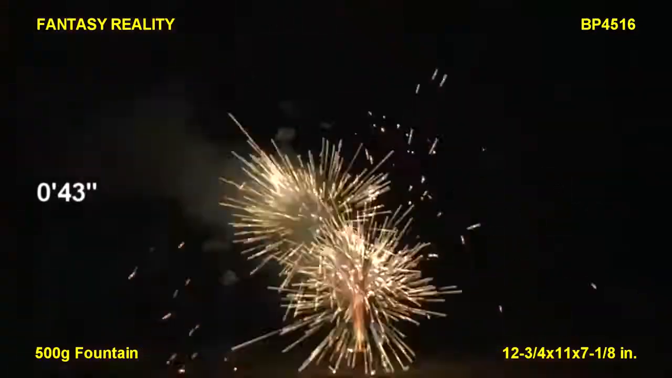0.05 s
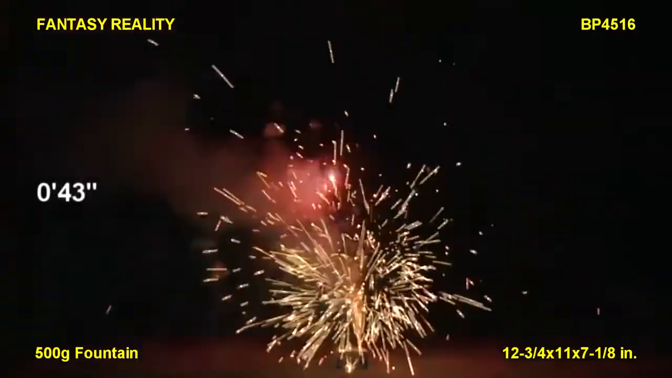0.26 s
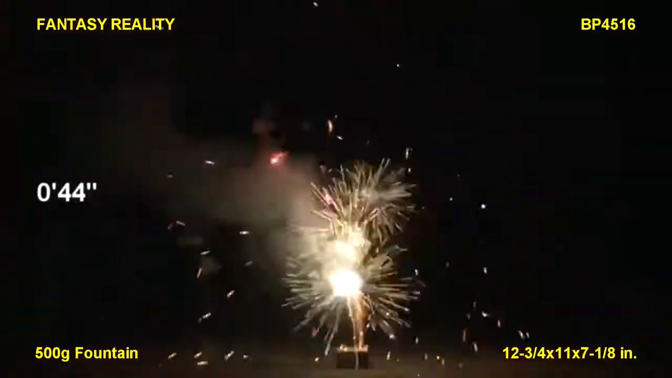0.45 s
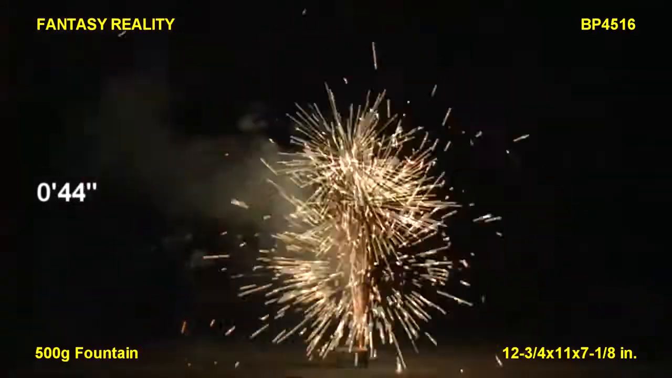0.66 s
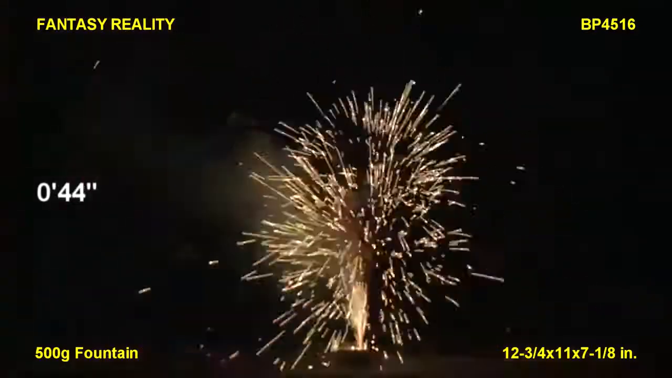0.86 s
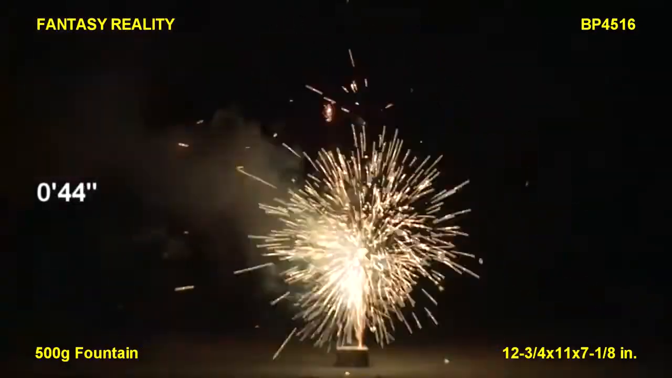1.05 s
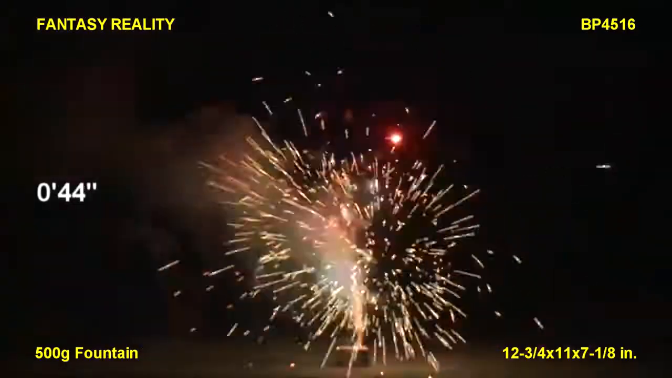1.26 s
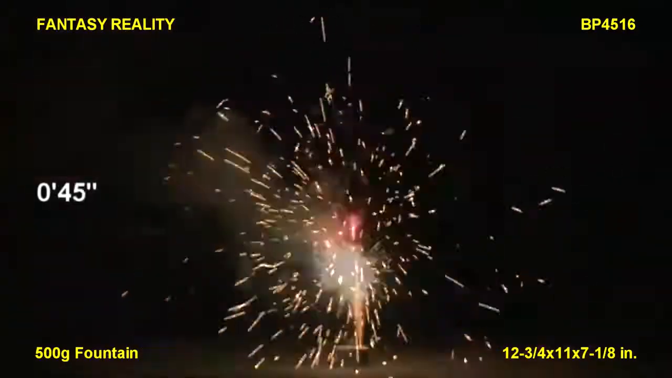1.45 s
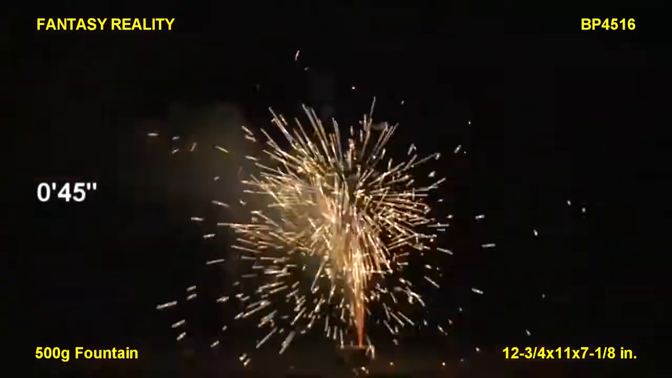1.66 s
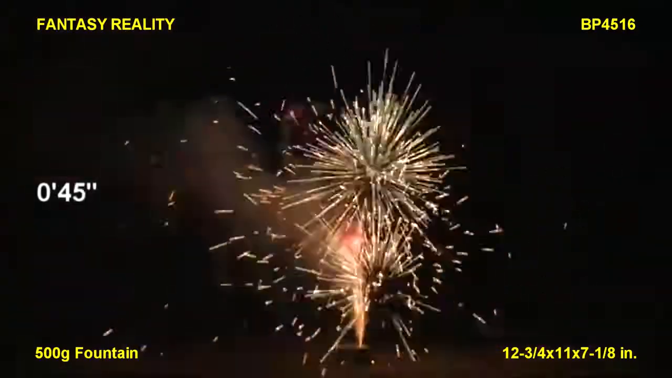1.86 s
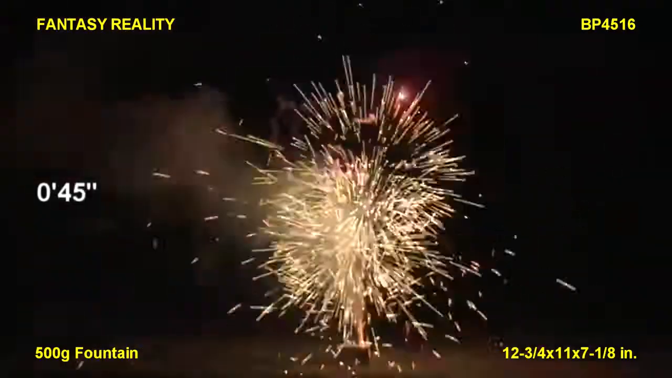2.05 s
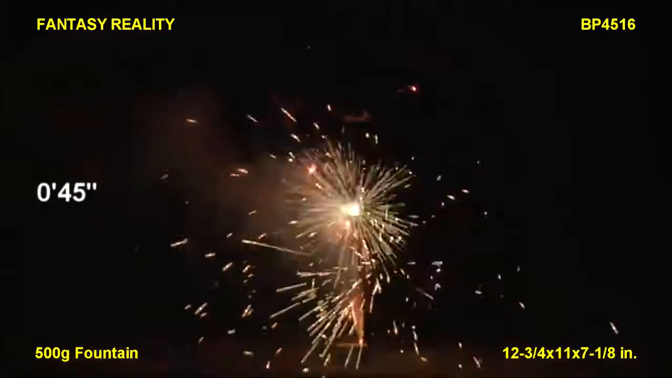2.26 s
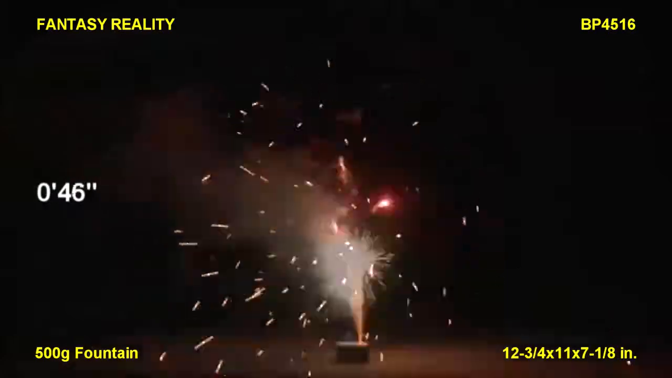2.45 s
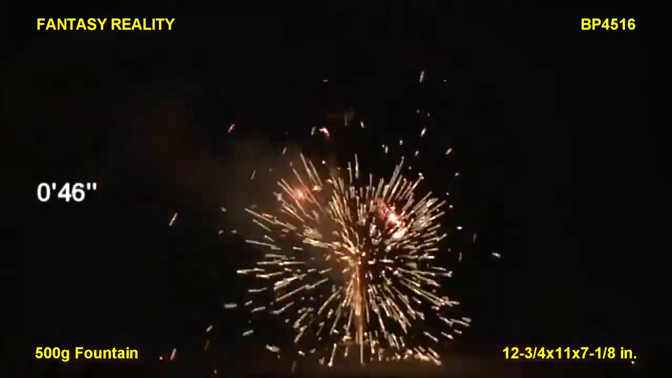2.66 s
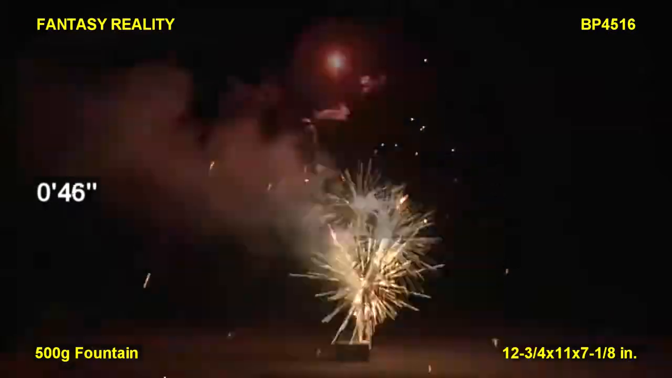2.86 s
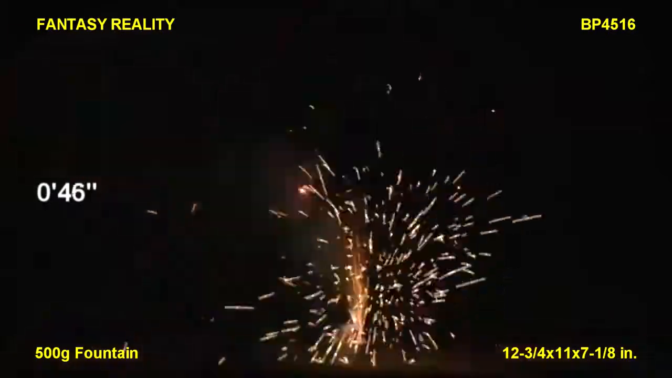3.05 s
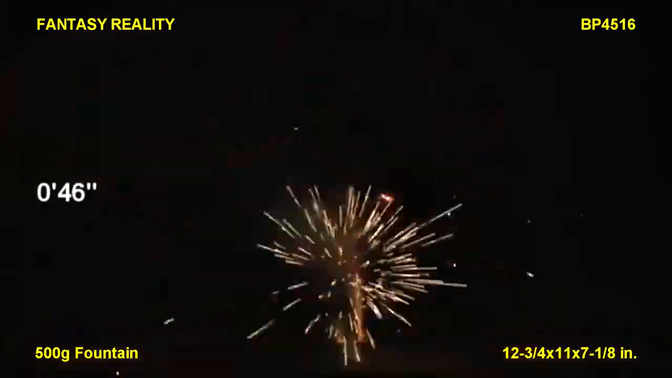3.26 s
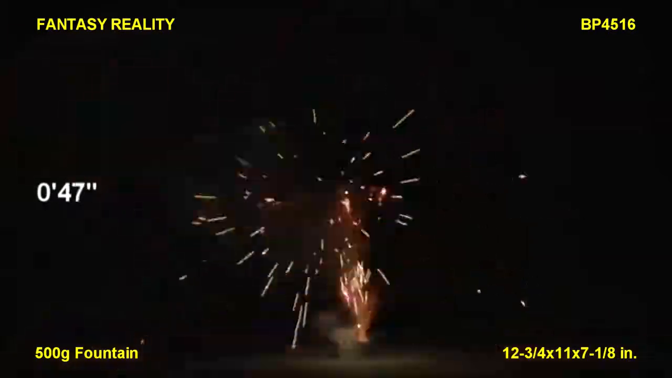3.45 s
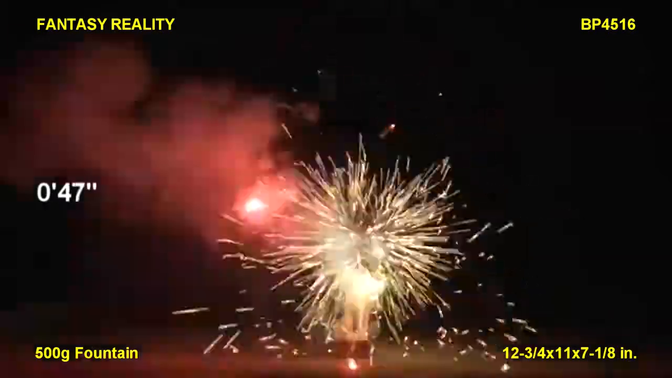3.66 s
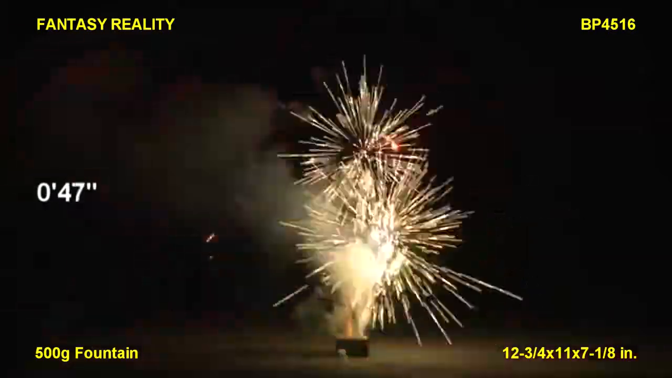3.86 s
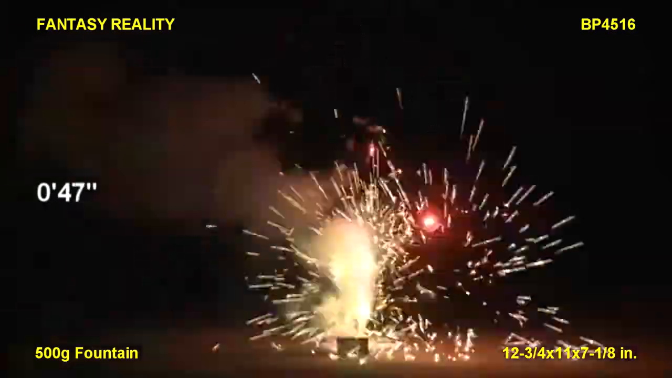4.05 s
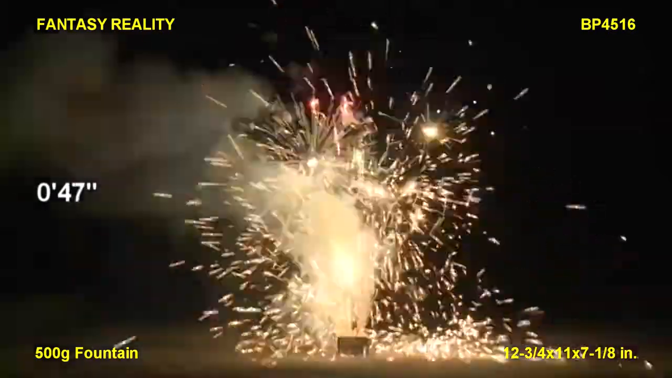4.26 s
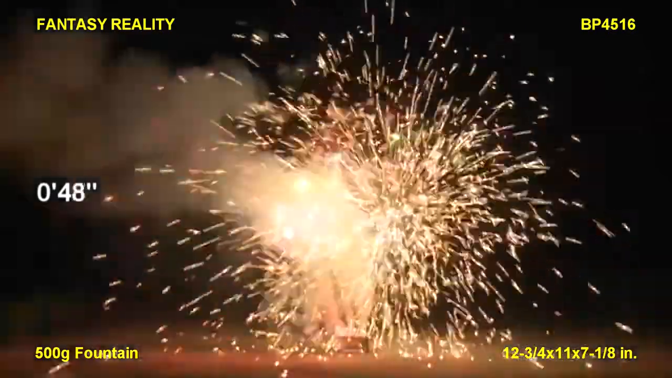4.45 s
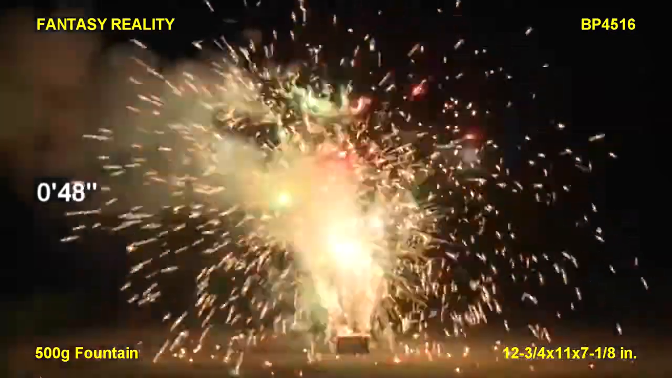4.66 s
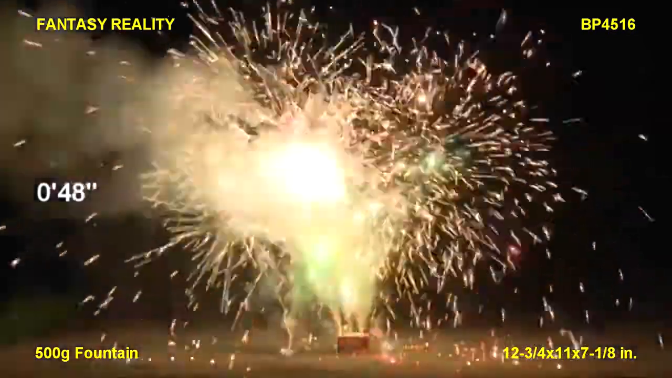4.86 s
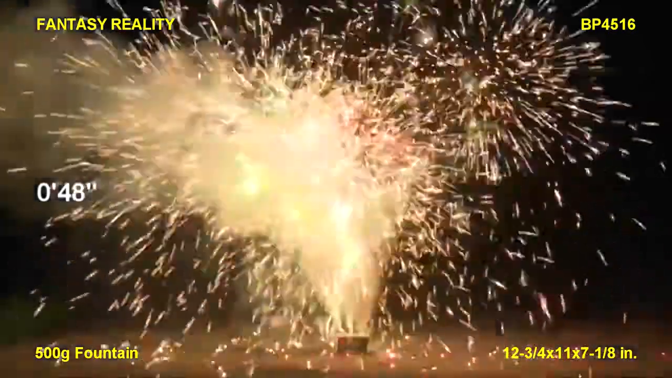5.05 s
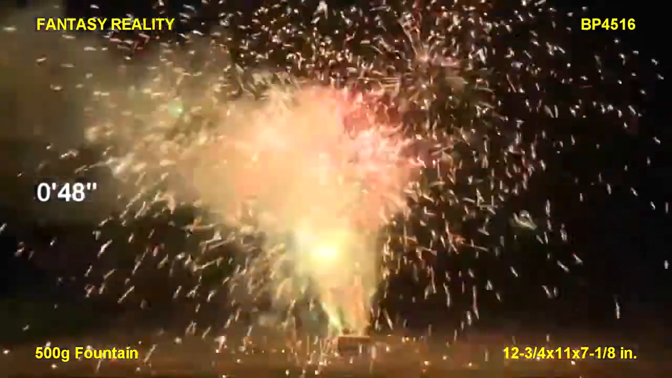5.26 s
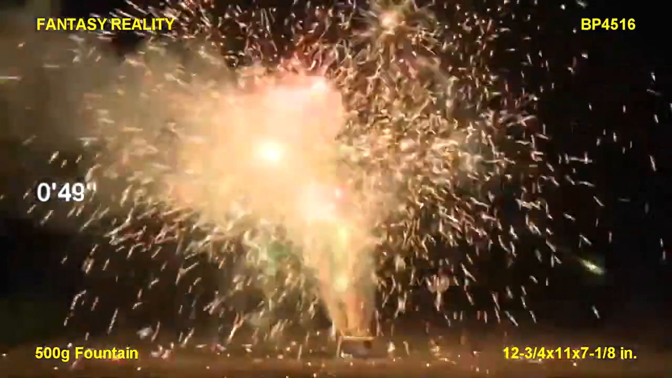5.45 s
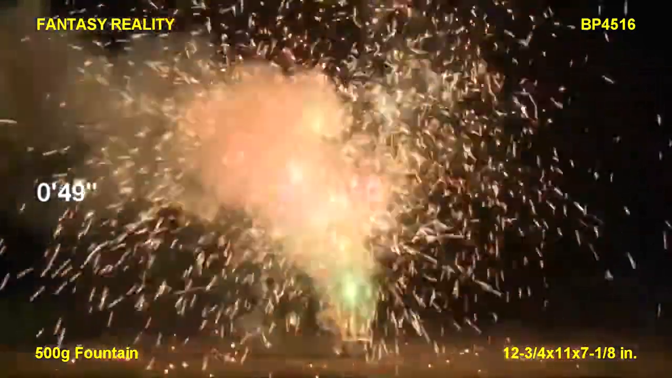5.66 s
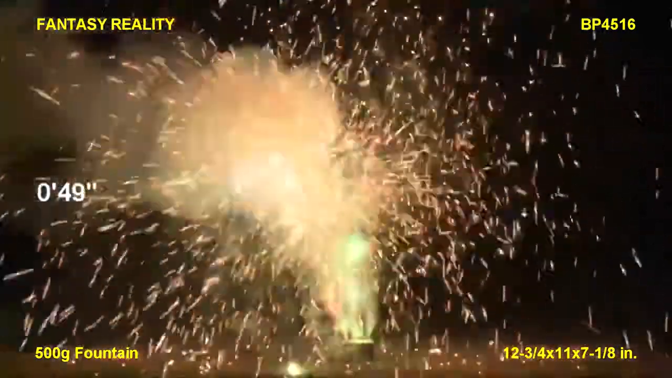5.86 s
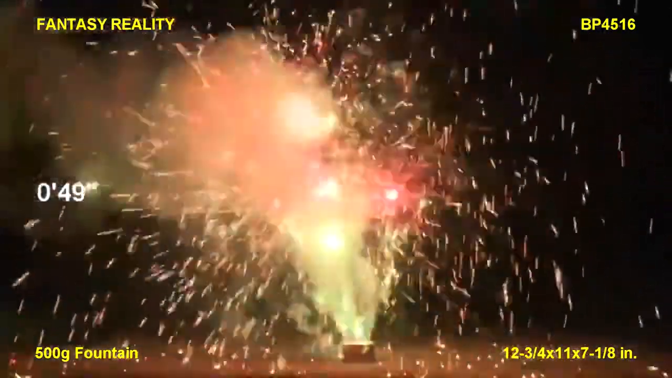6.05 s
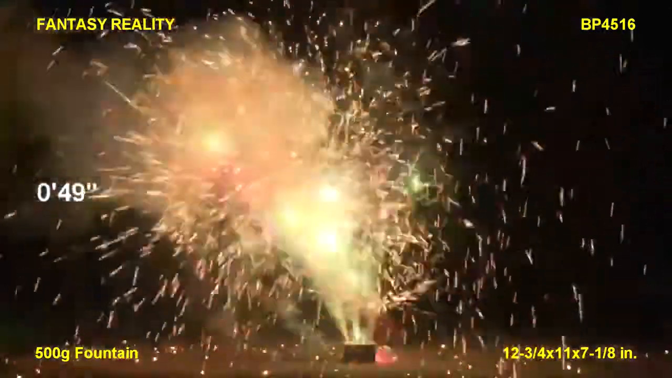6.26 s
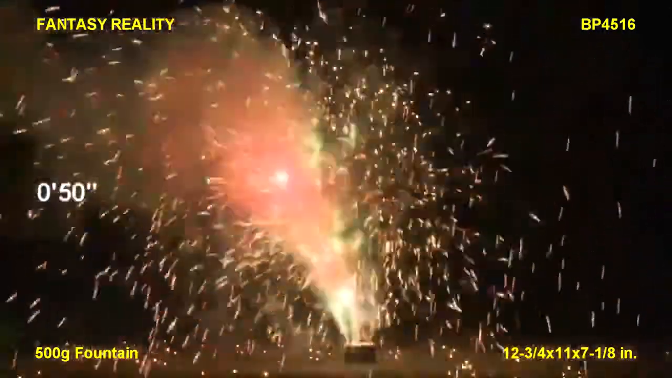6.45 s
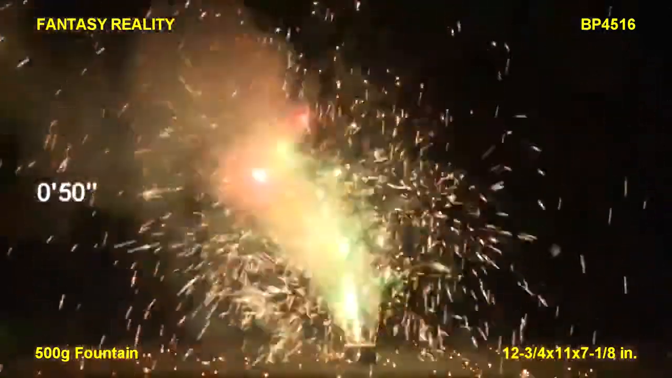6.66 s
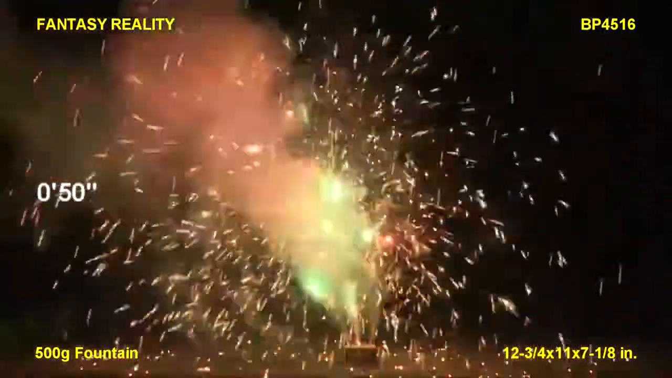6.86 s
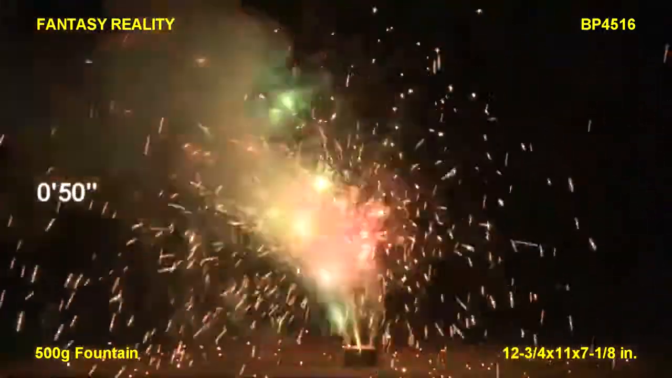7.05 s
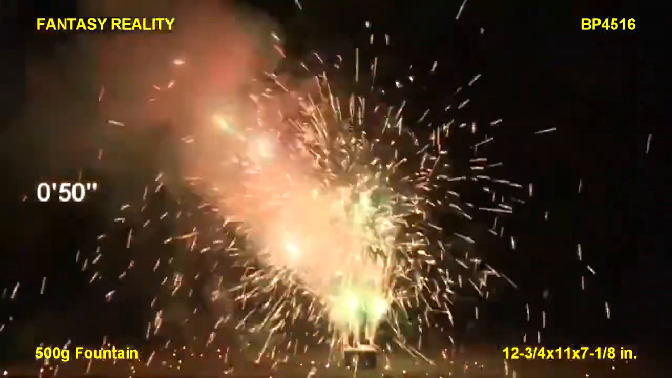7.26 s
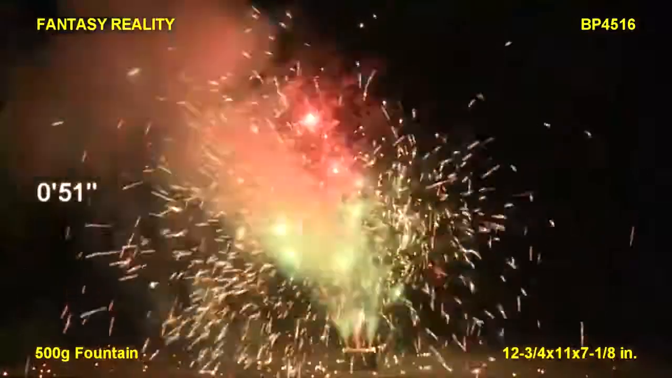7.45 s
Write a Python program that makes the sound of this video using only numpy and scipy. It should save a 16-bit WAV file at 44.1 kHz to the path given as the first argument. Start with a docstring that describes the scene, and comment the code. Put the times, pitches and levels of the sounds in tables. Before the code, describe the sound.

Outdoors at night, a ground firework fountain is already burning. From 0 to 3 s, hard, dry snaps arrive irregularly, roughly ten to fifteen a second, in tight clusters with short gaps, growing somewhat louder; a faint low gas roar and hiss sputters beneath. Between 3 and 4 s the cracks are sparser but strong. From about 4.1 s they bunch into a dense barrage, with muffled tube pops and swarms of tiny sharp ticks around 4.5, 5.05 and 5.4 s. After 5.5 s the big cracks weaken, leaving finer crackle and isolated snaps; 6.3 to 7.2 s is thin and quieter, then several loud cracks return until the cut at about 7.5 s. Each crack is click-short with a ground slap and faint yard tail. The right is close, dull and overloaded; the left follows about 10 ms later, thin and bright.

```python
"""Crackling stars from a ground fountain firework: each burst is a pressure impulse shaped into a short blast,
heard direct and off the ground at two microphones: near (right, dull, reversed, overloading), then about
10 ms later far (left, thin, bright). Small sparks are shorter blasts, tube pops longer, duller ones.
Blasts also scatter off a hard yard, leaving noise tails. A gas jet adds shaped noise with an uneven level."""
import sys
import numpy as np
from scipy import signal
from scipy.fft import rfft, irfft
from scipy.io import wavfile

SR = 44100
rng = np.random.default_rng(int(sys.argv[2]) if len(sys.argv) > 2 else 0)


def wrap_up_sound(samples):
    """Save the sound to the file named by the first command line argument, as 16-bit audio."""
    columns = np.atleast_2d(samples).T
    # keep every value between -1 and 1, then stretch to whole-number steps
    tamed = np.clip(columns, -1, 1)
    steps = np.round(tamed * 32767).astype(np.int16)
    wavfile.write(sys.argv[1], SR, steps)


N = 331632

# All blast levels are pressures ahead of the microphones.
# star bursts: near_start_s, level_db, extra_travel_to_far_ms, far_bounce_delay_ms
STAR_BURSTS = [(0.0109, -8.1, 10.75, 0.98), (0.0445, -10.6, 10.93, 0.66), (0.1155, -18.1, 10.77, 0.57),
               (0.1198, -6.4, 9.93, 0.93), (0.125, -14.9, 10.93, 0.66), (0.132, -6.0, 10.68, 0.45),
               (0.2228, -7.8, 10.5, 0.82), (0.2286, -4.2, 10.43, 0.54), (0.2864, -4.7, 10.09, 0.63),
               (0.2951, -12.1, 11.13, 0.61), (0.301, -10.2, 10.7, 0.77), (0.3219, -10.4, 10.63, 0.48),
               (0.4061, -5.2, 11.04, 0.39), (0.4204, -6.0, 10.34, 0.59), (0.5391, -7.3, 10.52, 0.86),
               (0.5542, -5.0, 10.45, 0.54), (0.5605, -4.2, 10.66, 1.09), (0.6418, -6.8, 11.02, 0.77),
               (0.6659, -8.6, 11.6, 0.63), (0.6669, -2.7, 9.73, 1.11), (0.6711, -5.9, 10.66, 0.73),
               (0.7107, -6.0, 10.7, 0.66), (0.7262, -6.4, 10.45, 1.04), (0.7401, -7.3, 10.02, 1.32),
               (0.7742, -8.2, 10.63, 1.07), (0.7869, -7.5, 10.41, 1.02), (0.8286, -9.9, 10.23, 0.61),
               (0.8453, -4.0, 10.43, 0.82), (0.877, -6.7, 10.07, 0.95), (0.8972, -6.3, 10.7, 0.77),
               (0.8995, -4.7, 10.93, 0.7), (0.9036, -3.5, 10.54, 1.18), (1.032, -6.0, 10.63, 0.57),
               (1.0928, -12.6, 10.61, 0.95), (1.1013, -4.0, 10.48, 0.84), (1.1303, -9.3, 10.77, 0.73),
               (1.1548, -10.5, 10.48, 0.75), (1.1571, -8.5, 10.57, 0.48), (1.1582, -9.8, 10.98, 0.68),
               (1.1877, -2.1, 10.93, 1.0), (1.2145, -11.4, 10.79, 0.5), (1.2159, -4.0, 9.64, 1.22),
               (1.2241, -4.5, 10.09, 0.75), (1.2531, -9.5, 10.45, 0.75), (1.2653, -13.5, 10.91, 0.59),
               (1.2763, -2.1, 10.29, 0.84), (1.2822, -11.1, 10.07, 0.86), (1.3033, -3.5, 10.77, 0.73),
               (1.366, -15.1, 10.43, 0.57), (1.3703, -6.9, 10.63, 1.18), (1.3752, -4.5, 11.02, 0.43),
               (1.4461, -1.0, 10.18, 0.98), (1.4567, -15.4, 10.5, 0.61), (1.4681, -9.9, 10.5, 0.79),
               (1.4705, -7.1, 10.02, 0.91), (1.5599, -8.4, 10.36, 0.63), (1.566, -16.1, 10.82, 0.59),
               (1.5724, -14.9, 10.32, 0.66), (1.6038, -12.5, 10.7, 0.52), (1.622, -1.9, 10.52, 0.77),
               (1.6341, -4.1, 10.82, 0.84), (1.6935, -4.0, 10.27, 0.84), (1.7118, -5.4, 10.36, 0.63),
               (1.7209, -4.1, 10.27, 1.07), (1.7969, -7.4, 10.73, 0.77), (1.8067, -3.6, 10.63, 0.98),
               (1.8581, -10.0, 10.63, 0.5), (1.8671, -1.4, 10.32, 0.98), (1.9256, -11.9, 11.07, 0.52),
               (1.9278, -3.7, 10.5, 1.25), (1.9888, -3.9, 10.27, 0.86), (1.9986, -5.0, 10.27, 0.52),
               (1.9994, -9.0, 10.86, 0.84), (2.0331, -7.2, 10.57, 0.68), (2.0642, -6.6, 10.68, 0.36),
               (2.0911, -11.5, 10.77, 0.29), (2.0927, -9.0, 10.25, 0.88), (2.108, -0.6, 10.66, 1.16),
               (2.1305, -2.8, 10.57, 0.75), (2.1374, -6.4, 10.73, 1.02), (2.1729, -6.0, 10.66, 0.93),
               (2.1815, -4.0, 10.66, 1.07), (2.187, -9.7, 10.59, 0.79), (2.2218, -5.7, 10.75, 0.36),
               (2.2573, -4.5, 10.52, 0.66), (2.3028, -6.7, 10.93, 0.63), (2.3515, -5.1, 10.45, 1.0),
               (2.4198, -5.8, 9.93, 1.04), (2.4285, -10.6, 10.75, 0.68), (2.5613, -8.2, 10.82, 0.61),
               (2.5741, -2.6, 10.52, 0.48), (2.6279, -2.5, 11.05, 1.0), (2.6422, -1.2, 10.52, 0.7),
               (2.6915, -1.8, 10.68, 0.41), (2.7029, -5.5, 10.52, 0.63), (2.7099, -14.1, 10.54, 0.66),
               (2.9321, -9.7, 10.91, 0.5), (2.9593, -3.8, 10.36, 1.0), (2.9597, -3.5, 11.06, 0.79),
               (2.9971, -3.2, 10.61, 0.75), (2.9987, -4.4, 10.05, 0.66), (3.0054, -5.8, 10.63, 0.88),
               (3.0759, -5.8, 11.04, 0.68), (3.0843, -11.5, 10.95, 0.27), (3.0883, -9.7, 10.98, 0.61),
               (3.3123, -7.1, 10.32, 0.54), (3.3965, -6.7, 10.43, 0.79), (3.4113, -6.6, 10.84, 0.45),
               (3.4761, -9.1, 9.64, 1.02), (3.5759, -2.2, 10.54, 0.39), (3.6281, -4.1, 10.2, 1.09),
               (3.657, -2.5, 10.66, 0.52), (3.6621, -2.1, 11.27, 0.34), (3.7333, -2.2, 10.29, 0.79),
               (3.7371, -2.0, 10.93, 0.73), (3.7724, -3.1, 11.04, 0.66), (3.9033, -7.5, 10.95, 0.73),
               (3.9212, -7.1, 10.34, 1.29), (3.9351, -1.8, 11.02, 0.75), (3.978, -5.5, 10.52, 0.57),
               (3.9864, -7.6, 11.11, 0.48), (4.0735, -3.7, 12.5, 0.34), (4.099, -1.6, 11.04, 0.48),
               (4.1609, -7.8, 10.86, 0.73), (4.175, -4.8, 10.0, 1.18), (4.1755, -7, 11.0, 0.15),
               (4.1787, -11.2, 10.5, 0.77), (4.2052, -7.3, 11.02, 0.59), (4.2111, -8.5, 10.5, 0.54),
               (4.2274, -16.3, 10.3, 0.7), (4.2331, -7.1, 10.84, 0.73), (4.2382, -12.6, 10.73, 1.02),
               (4.2494, -6.8, 10.52, 0.82), (4.2568, -4.5, 10.09, 0.75), (4.3458, -0.9, 9.8, 1.25),
               (4.3461, -8.8, 9.9, 1.35), (4.3609, -22, 11.0, 0.5), (4.3914, -3.3, 10.02, 0.73),
               (4.3961, -12.2, 11.5, 0.79), (4.4099, -2.4, 10.25, 0.15), (4.4246, -0.5, 10.98, 1.13),
               (4.4403, -14.7, 10.3, 0.7), (4.4468, -16.5, 10.05, 1.32), (4.4473, -11.3, 10.3, 1.68),
               (4.4542, -5.6, 10.7, 1.16), (4.4577, -4.7, 10.39, 0.84), (4.4583, -2.9, 10.34, 1.11),
               (4.4721, -3.9, 10.36, 1.16), (4.4927, -19, 11.0, 1.0), (4.4972, -21, 10.9, 0.6),
               (4.5329, -1.9, 11.04, 0.84), (4.5467, -7.2, 9.82, 0.84), (4.5499, -12.3, 9.32, 0.86),
               (4.6057, -10.2, 9.02, 1.07), (4.6215, -8.8, 10.91, 0.5), (4.633, -12.8, 9.41, 0.95),
               (4.7459, -8.1, 10.93, 0.57), (4.7511, -14.8, 10.3, 0.7), (4.7518, -4.4, 10.23, 0.82),
               (4.7606, -18.2, 8.8, 1.36), (4.7642, -15, 11.0, 1.2), (4.7678, -1.3, 10.11, 0.73),
               (4.7785, -18.6, 9.61, 1.41), (4.812, -8.1, 11.02, 0.61), (4.8178, -8.2, 10.02, 0.79),
               (4.8322, -14.6, 10.41, 1.2), (4.8678, -11.5, 11.22, 1.22), (4.8848, -3.8, 10.61, 1.13),
               (4.8895, -8.5, 10.14, 0.15), (4.9082, -8.3, 9.75, 1.16), (4.9301, -3.7, 10.3, 0.88),
               (4.9324, -7.4, 10.14, 1.18), (4.9443, -21, 11.0, 1.0), (4.9532, -4.9, 9.46, 1.13),
               (4.9688, -18.9, 9.34, 1.29), (4.9851, -5.0, 8.98, 0.79), (5.0031, -13.5, 10.3, 0.7),
               (5.0056, -22, 10.3, 1.38), (5.0296, -15.8, 10.07, 1.07), (5.0515, -15.8, 10.73, 0.5),
               (5.0649, -6.3, 9.86, 1.38), (5.0675, -12.9, 9.41, 0.15), (5.0984, -2.6, 9.77, 0.86),
               (5.107, -8.6, 10.41, 1.29), (5.142, -6.7, 9.37, 1.36), (5.1682, -20, 9.4, 0.9),
               (5.1735, -13.1, 10.16, 0.95), (5.204, -1.9, 11.02, 0.84), (5.2312, -8.2, 9.46, 0.98),
               (5.2568, -19.0, 9.91, 1.13), (5.2641, -15.0, 10.16, 0.86), (5.3222, -15.3, 9.23, 1.29),
               (5.3299, -14.4, 10.59, 1.2), (5.3551, -19.1, 9.71, 0.75), (5.3783, -7.1, 9.68, 1.18),
               (5.3933, -18, 10.3, 1.0), (5.3979, -12.6, 9.41, 0.9), (5.4015, -14.5, 9.68, 1.09),
               (5.4349, -5.7, 10.25, 1.09), (5.4379, -10.4, 10.95, 0.15), (5.4595, -20.3, 9.14, 1.29),
               (5.4619, -20, 10.3, 0.7), (5.4991, -13.3, 8.4, 1.43), (5.5323, -15.1, 8.55, 1.34),
               (5.5349, -11.9, 10.25, 0.15), (5.552, -18.1, 9.5, 0.95), (5.5579, -16.9, 8.71, 1.66),
               (5.566, -21, 10.3, 0.9), (5.572, -22, 9.3, 1.1), (5.5992, -10, 10.3, 0.7),
               (5.6344, -19.0, 10.5, 1.63), (5.6725, -12.0, 10.84, 0.68), (5.6868, -21.5, 9.77, 0.88),
               (5.7146, -18.5, 9.86, 1.2), (5.7194, -17.0, 10.86, 0.98), (5.7325, -9.3, 9.32, 0.93),
               (5.7614, -19.3, 10.79, 1.59), (5.7692, -21, 10.9, 0.86), (5.7827, -15.8, 8.46, 1.09),
               (5.8144, -5.9, 7.9, 0.98), (5.8908, -15.0, 9.5, 1.13), (5.8944, -17.7, 9.32, 1.27),
               (5.9348, -17.3, 8.44, 1.18), (6.0046, -22.8, 8.87, 1.22), (6.0423, -8.6, 9.3, 0.95),
               (6.0539, -22.5, 8.82, 1.38), (6.0906, -21, 9.3, 1.0), (6.1691, -13.4, 9.14, 1.52),
               (6.1705, -5.5, 10.0, 1.07), (6.2017, -20.5, 9.5, 1.25), (6.2056, -11.3, 9.71, 1.29),
               (6.25, -20.0, 9.8, 1.38), (6.278, -8.7, 8.1, 1.11), (6.288, -12.6, 9.8, 1.16),
               (6.2966, -22, 10.3, 0.84), (6.3085, -18.1, 10.29, 0.7), (6.3483, -21.3, 10.09, 1.04),
               (6.3714, -22.8, 10.7, 0.88), (6.545, -23.8, 10.5, 0.39), (6.5898, -17.4, 10.82, 0.91),
               (6.6304, -22, 10.3, 0.7), (6.6354, -11.7, 9.07, 1.0), (6.6648, -25, 9.9, 0.9),
               (6.6856, -22.4, 11.32, 1.02), (6.7011, -21.7, 10.29, 0.77), (6.7204, -14.5, 10.11, 0.48),
               (6.8007, -14.1, 9.93, 0.95), (6.81, -7.9, 9.37, 1.0), (6.8108, -8.6, 9.95, 0.66),
               (6.8752, -25.5, 9.98, 0.93), (7.0131, -24.2, 9.73, 0.75), (7.0307, -14.3, 10.32, 0.86),
               (7.0971, -22, 10.5, 0.7), (7.1059, -22.2, 9.61, 0.88), (7.1483, -23, 10.14, 0.54),
               (7.1787, -22, 10.88, 0.52), (7.2236, -23, 9.75, 0.93), (7.2381, -4.5, 10.59, 1.13),
               (7.2804, -14.0, 9.93, 0.79), (7.2863, -7.5, 10.11, 1.07), (7.3265, -10.9, 10.41, 0.41),
               (7.3423, -11.4, 9.5, 0.75), (7.3996, -8.2, 10.07, 0.75), (7.4244, -5.9, 9.09, 0.77)]
# jet level over time, both channels together, before the near resonances: time_s, level_db
JET_LEVEL = [(0.0, -47), (2.0, -48), (2.8, -50), (2.9, -43), (3.2, -53), (3.45, -46.5), (4.2, -46),
             (4.65, -42.5), (5.0, -44), (5.72, -44), (6.43, -47), (6.68, -44), (6.95, -46.5), (7.3, -42.5),
             (7.52, -46.5)]
# jet spectrum, relative: frequency_hz, density_db
JET_SPECTRUM = [(35, -53), (60, -9.5), (294, -0.5), (427, 1.5), (566, -2.5), (1280, -3), (1950, -6),
                (8320, -12), (13000, -14.5), (16000, -31)]
# jet balance before the near resonances: frequency_hz, left_minus_right_db
JET_BALANCE = [(100, -9.5), (380, -16), (1300, -14.5), (5000, -3.5), (14000, -2.5)]
# yard, far row then near row: scatter_db, scatter_t60_s, tail_db, tail_t60_s, tail_lowpass_hz (limited to 0.45 SR)
YARD = [(-26.5, 0.016, -46.5, 0.23, 21000), (-33, 0.012, -58, 0.37, 37000)]
# wall echoes at the near microphone: delay_s, level_db, smear_s (half width to 1/e)
WALL_ECHOES = [(0.051, -50, 0.0048), (.084, -67.5, 0.0058)]
# capsule resonances: centre_hz, width_hz, gain_db
FAR_RESONANCES = [(80, 304, 10.5), (760, 250, 5), (3120, 1700, 4.5), (11400, 5200, 5.5)]
NEAR_RESONANCES = [(3838, 550, 7), (1663, 850, -3.5), (9740, 1850, 11)]
# spark spray outside the swarms: time_s, rate_per_s
SPARK_RATE = [(0, .5), (4.35, 1), (4.72, 30), (4.85, 100), (5.15, 40), (6.0, 25), (6.12, 2), (7.46, 3)]
# spark swarms: centre_s, extra_peak_rate_per_s
SPARK_SWARMS = [(4.23, 150), (4.48, 400), (5.05, 400), (5.28, 100), (5.41, 400), (5.56, 150)]
# loudest small sparks: near_start_s, level_db
LOUD_SPARKS = [(5.0232, -30), (5.0387, -17), (5.045, -29), (5.111, -24), (5.2701, -27), (5.273, -21),
               (5.2813, -32), (5.2932, -21.5), (5.358, -19), (5.4128, -19), (5.4276, -22), (5.452, -22),
               (5.5173, -26), (5.5561, -12.5), (5.6067, -19), (5.6904, -28), (5.6975, -22), (5.7448, -30),
               (5.759, -15), (5.796, -20), (5.8269, -26), (5.8432, -22.5), (5.877, -31), (5.942, -17.5),
               (5.9679, -22.5), (6.215, -35), (6.3027, -21), (6.338, -29), (6.3939, -37), (6.7677, -35),
               (6.7865, -44), (6.9037, -25), (7.1125, -28), (7.2693, -32), (7.4364, -21.5), (7.4393, -24)]
# muffled pops as charges light in the tube, before their lowpass: near_start_s, level_db
TUBE_POPS = [(0.939, -26), (0.9597, -32), (1.8341, -13), (2.898, -30.5), (3.7956, -21), (4.0821, -23),
             (4.1459, -17.5), (4.1886, -8), (4.6907, -9), (5.996, -23.5), (6.3142, -28), (6.5612, -38),
             (6.622, -29), (6.945, -31.5)]

# jet
ROAR_TOP_HZ, ROAR_FLUTTER_DB, HISS_FLICKER_DB = 1100, 4, 2.2

# blasts: length of the overpressure
STAR_BLAST_MS, SMALL_BLAST_MS, TUBE_BLAST_MS = 0.2, 0.16, 0.3
SMALL_BELOW_DB = -13.5   # weaker bursts come from small charges
SMALL_NEAR_BOUNCE_GAIN_DB = 0.5

# ground bounce; the near delay is a share of the far one, less a little
FAR_BOUNCE_DB, NEAR_BOUNCE_DB, BOUNCE_SPREAD_DB = -0.5, -3.5, 1.2
NEAR_BOUNCE_SHARE, NEAR_BOUNCE_LESS_MS = 0.34, 0.078

# sparks: random levels above a floor, up to a cap; ranges over the spray
SPARK_FLOOR_DB, SPARK_MEAN_RISE_DB, SPARK_CAP_DB = -34, 5.5, -26
SPARK_TRAVEL_MS, SPARK_BOUNCE_MS = (9.2, 11), (0.4, 1.5)
SWARM_S = 0.057   # half width to 1/e

# tube mouth: low down, so the bounce nearly merges with the blast
TUBE_TRAVEL_MS, TUBE_BOUNCE_MS, TUBE_LOWPASS_HZ = 11.1, 0.1, 3000

TAIL_GRAIN_MS, TAIL_GRAIN_DB = 5.4, 1

# microphones and converter
FAR_HIGHPASS_HZ, FAR_BASS_DB, FAR_LOWPASS_HZ, FAR_GAIN_DB = 2360, -23.5, 12100, 0.2
NEAR_HIGHPASS_HZ, NEAR_ROLLOFF_HZ, NEAR_GAIN_DB = 209, 5100, 13
NEAR_TREBLE_DB = -17   # what passes above the roll-off
NEAR_CEILING = 0.94
CLIP_LEVEL, STOPBAND_HZ = 0.9, 17200


def from_db(db):
    """Decibels to amplitude ratio."""
    return 10 ** (np.asarray(db) / 20)


def rms_one(x):
    """Scale to unit rms."""
    return x / np.sqrt(np.mean(x ** 2) + 1e-20)


def over_time(points, t):
    """Straight lines between (time, value) points."""
    return np.interp(t, *np.transpose(points))


def over_log_hz(points, hz):
    """Straight lines between (frequency, value) points on a log frequency axis."""
    point_hz, value = np.transpose(points)
    return np.interp(np.log(hz), np.log(point_hz), value)


def butter_filter(x, hz, kind, order):
    """Butterworth low- or highpass, its corner kept below Nyquist."""
    sos = signal.butter(order, np.clip(hz, 20, 0.45 * SR), kind, fs=SR, output="sos")
    return signal.sosfilt(sos, x)


def resonate(x, resonances):
    """Each resonance in turn boosts or cuts its band, the rest staying flat."""
    for centre_hz, width_hz, gain_db in resonances:
        radius = np.exp(-np.pi * width_hz / SR)
        zeros = np.array([1, 0, -1]) * (1 - radius * radius) / 2
        poles = [1, -2 * radius * np.cos(2 * np.pi * centre_hz / SR), radius * radius]
        x = x + (from_db(gain_db) - 1) * signal.lfilter(zeros, poles, x)
    return x


def grainy_noise(hold_ms, spread_db):
    """White noise whose level glides to a new random value every hold_ms; rms 1."""
    time_ms = np.arange(N) / SR * 1000
    wander = np.interp(time_ms / hold_ms, np.arange(N), rng.standard_normal(N))
    return rms_one(from_db(spread_db * wander) * rng.standard_normal(N))


def sputter():
    """A fluttering low roar under a steadier hiss."""
    roar = butter_filter(grainy_noise(25, ROAR_FLUTTER_DB), ROAR_TOP_HZ, "low", order=2)
    hiss = butter_filter(grainy_noise(30, HISS_FLICKER_DB), ROAR_TOP_HZ, "high", order=2)
    return roar + hiss


def jet(level_db):
    """Burning gas leaves the tube as broad noise, unrelated at the two microphones; the near capsule colours it."""
    hz = np.maximum(np.arange(N // 2 + 1) * SR / N, 1)
    tilt_db = over_log_hz(JET_BALANCE, hz) / 2 * np.array([[1], [-1]])
    shape = from_db(over_log_hz(JET_SPECTRUM, hz) + tilt_db)
    far, near = rms_one(irfft(rfft([sputter(), sputter()]) * shape, N))
    return from_db(level_db) * np.array([far, resonate(near, NEAR_RESONANCES[:2])])


def impulse_train(start_s, level_db):
    """Impulses, each shared between the two samples around its moment."""
    sample, part = np.divmod(start_s * SR, 1)
    index = np.concatenate([sample, sample + 1]).astype(int)
    size = np.concatenate([1 - part, part]) * np.tile(from_db(level_db), 2)
    inside = (index >= 0) & (index < N)
    return np.bincount(index[inside], size[inside], N)


def whole_samples(time_s):
    """Round times to the sample grid."""
    return np.round(time_s * SR) / SR


def arrivals(rows, near_bounce_gain_db=0):
    """Each blast reaches both microphones direct and off the ground, the bounce varying in level."""
    near_s, level_db, travel_ms, bounce_ms = np.transpose(rows)
    bounce_db = level_db + rng.normal(0, BOUNCE_SPREAD_DB, len(near_s))
    far_s = whole_samples(near_s + travel_ms / 1000)
    far_bounce_s = whole_samples(far_s + bounce_ms / 1000)
    far = impulse_train(far_s, level_db) + impulse_train(far_bounce_s, bounce_db + FAR_BOUNCE_DB)
    near_bounce_ms = np.maximum(NEAR_BOUNCE_SHARE * bounce_ms - NEAR_BOUNCE_LESS_MS, 0)
    near_bounce_s = near_s + near_bounce_ms / 1000
    near_bounce = impulse_train(near_bounce_s, bounce_db + NEAR_BOUNCE_DB + near_bounce_gain_db)
    return np.array([far, impulse_train(near_s, level_db) + near_bounce])


def scattered(direct, decay):
    """Scattered paths as new noise under the summed energy decay of all blasts."""
    energy = signal.fftconvolve(direct ** 2, decay ** 2)[:N]
    return np.sqrt(np.abs(energy)) * grainy_noise(TAIL_GRAIN_MS, TAIL_GRAIN_DB)


def yard(direct):
    """Rough ground scatters for a few ms; surroundings give a faint tail, walls smeared echoes at the near side."""
    t = np.arange(SR // 2) / SR
    out = []
    for side, (scatter_db, scatter_t60_s, tail_db, tail_t60_s, lowpass_hz) in enumerate(YARD):
        scatter = scattered(direct[side], from_db(scatter_db - 60 * t / scatter_t60_s))
        tail_decay = from_db(tail_db - 60 * t / tail_t60_s)
        if side == 1:
            for delay_s, level_db, smear_s in WALL_ECHOES:
                tail_decay = tail_decay + from_db(level_db) * np.exp(-((t - delay_s) / smear_s) ** 2)
        tail = butter_filter(scattered(direct[side], tail_decay), lowpass_hz, "low", order=1)
        out.append(direct[side] + scatter + tail)
    return np.array(out)


def blast(impulses, length_ms):
    """A jump of pressure that sinks into a longer suction."""
    t = np.arange(SR // 200) / SR / (length_ms / 1000)
    return signal.lfilter((1 - t) * np.exp(-t), [1], impulses)


def tube_pops():
    """Charges popping in the tube: longer, duller blasts, all from the same low spot."""
    rows = [(start_s, level_db, TUBE_TRAVEL_MS, TUBE_BOUNCE_MS) for start_s, level_db in TUBE_POPS]
    pops = blast(yard(arrivals(rows)), TUBE_BLAST_MS)
    return butter_filter(pops, TUBE_LOWPASS_HZ, "low", order=1)


def spark_rate(t):
    """The spray plus swarms that swell and fade."""
    rate = over_time(SPARK_RATE, t)
    for centre_s, extra_per_s in SPARK_SWARMS:
        rate = rate + extra_per_s * np.exp(-((t - centre_s) / SWARM_S) ** 2)
    return rate


def sparks(rate_per_s):
    """Rows like STAR_BURSTS: randomly timed and sized sparks plus the loud ones, at random travels and heights."""
    samples = np.flatnonzero(rng.random(N) < rate_per_s / SR)
    size, travel, height = rng.random((3, N))
    level_db = SPARK_FLOOR_DB - SPARK_MEAN_RISE_DB * np.log(size[samples] + 1e-9)
    level_db = np.minimum(level_db, SPARK_CAP_DB)
    start_s, level_db = np.concatenate([np.transpose(LOUD_SPARKS), [samples / SR, level_db]], axis=1)
    travel_ms = np.interp(travel[:len(start_s)], (0, 1), SPARK_TRAVEL_MS)
    bounce_ms = np.interp(height[:len(start_s)], (0, 1), SPARK_BOUNCE_MS)
    return np.transpose([start_s, level_db, travel_ms, bounce_ms])


def small_charges(weak_bursts, t):
    """Weak bursts and sparks: small charges give shorter, brighter blasts."""
    rows = np.concatenate([weak_bursts, sparks(spark_rate(t))])
    return blast(yard(arrivals(rows, SMALL_NEAR_BOUNCE_GAIN_DB)), SMALL_BLAST_MS)


def star_bursts(strong_bursts):
    """The strong crackling stars, as full-length blasts over the yard."""
    return blast(yard(arrivals(strong_bursts)), STAR_BLAST_MS)


def microphones(air):
    """The far one is thin, with a little bass left; the near one is dull, reversed and overloads softly."""
    far = butter_filter(air[0], FAR_HIGHPASS_HZ, "high", order=1) + from_db(FAR_BASS_DB) * air[0]
    far = butter_filter(far, FAR_LOWPASS_HZ, "low", order=2)
    far = from_db(FAR_GAIN_DB) * resonate(far, FAR_RESONANCES)
    near = butter_filter(air[1], NEAR_HIGHPASS_HZ, "high", order=2)
    treble = butter_filter(near, NEAR_ROLLOFF_HZ, "high", order=2)
    near = butter_filter(near, NEAR_ROLLOFF_HZ, "low", order=2) - from_db(NEAR_TREBLE_DB) * treble
    near = from_db(NEAR_GAIN_DB) * resonate(near, NEAR_RESONANCES)
    return np.array([far, -NEAR_CEILING * np.tanh(near / NEAR_CEILING)])


def scene():
    """Blasts through the microphones, plus the jet."""
    t = np.arange(N) / SR
    bursts = np.array(STAR_BURSTS)
    small = bursts[:, 1] < SMALL_BELOW_DB
    air = star_bursts(bursts[~small]) + small_charges(bursts[small], t) + tube_pops()
    return microphones(air) + jet(over_time(JET_LEVEL, t))


def record(dry):
    """The converter clips hard, then a steep lowpass cuts the top."""
    clipped = np.clip(dry, -CLIP_LEVEL, CLIP_LEVEL)
    return signal.sosfilt(signal.cheby2(14, 80, STOPBAND_HZ, fs=SR, output="sos"), clipped)


dry = scene()
out = record(dry)
wrap_up_sound(out)
```